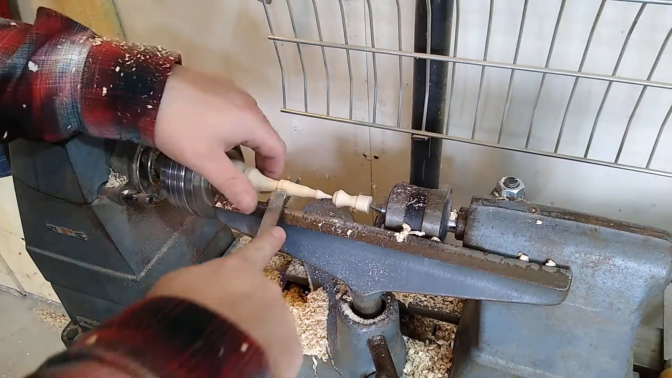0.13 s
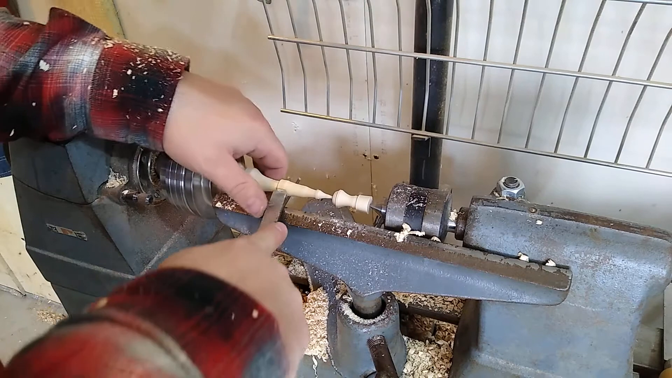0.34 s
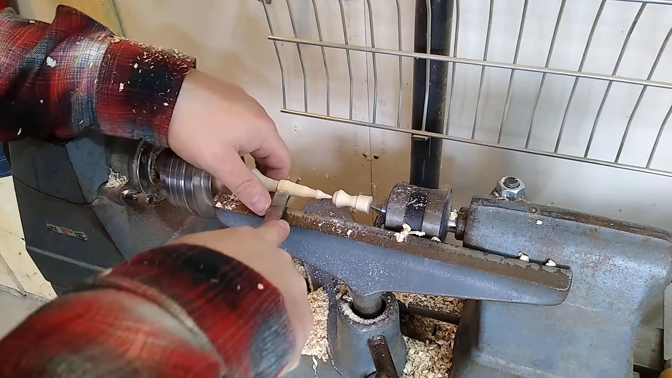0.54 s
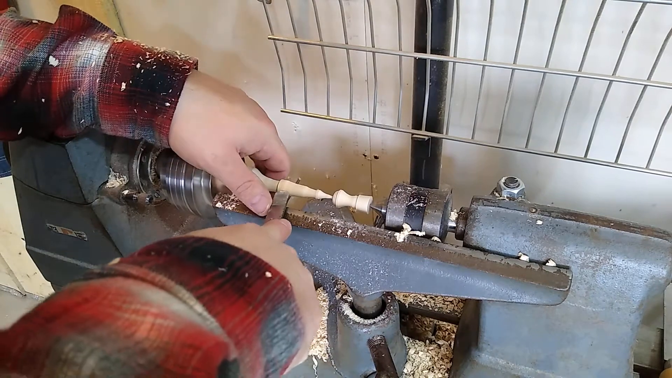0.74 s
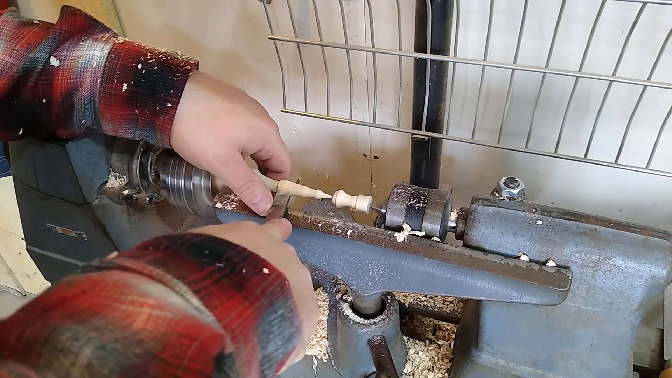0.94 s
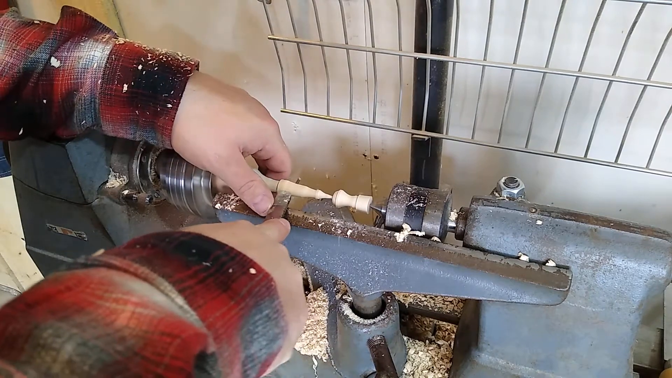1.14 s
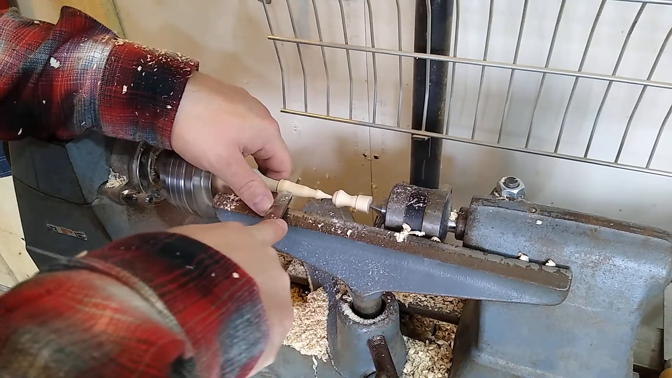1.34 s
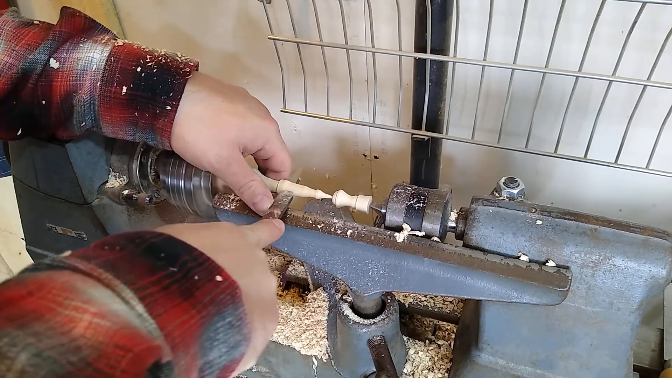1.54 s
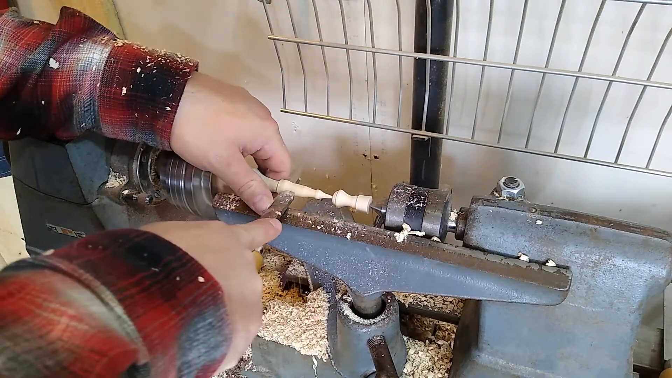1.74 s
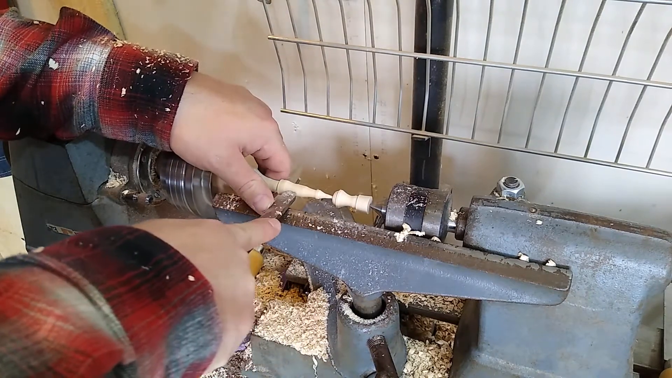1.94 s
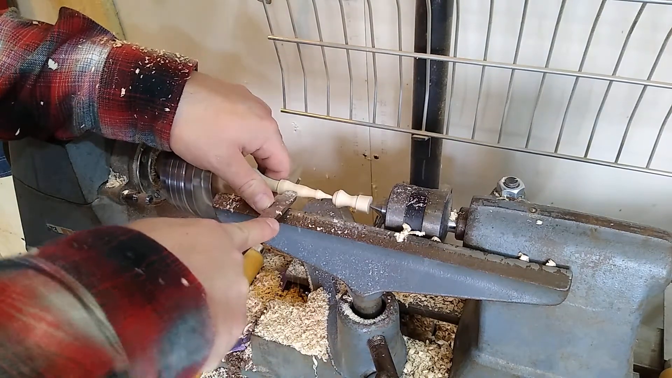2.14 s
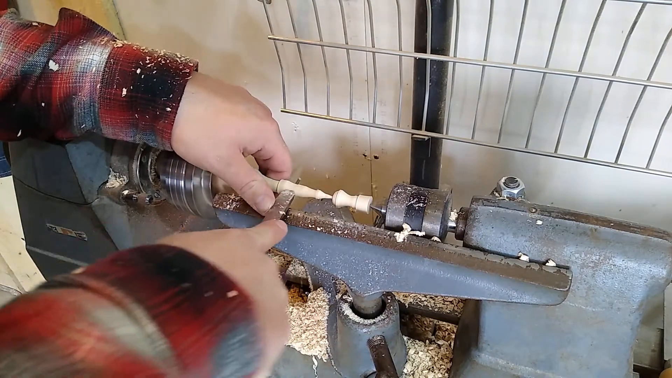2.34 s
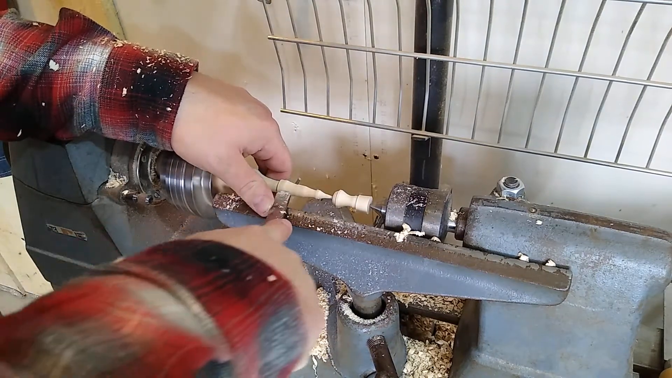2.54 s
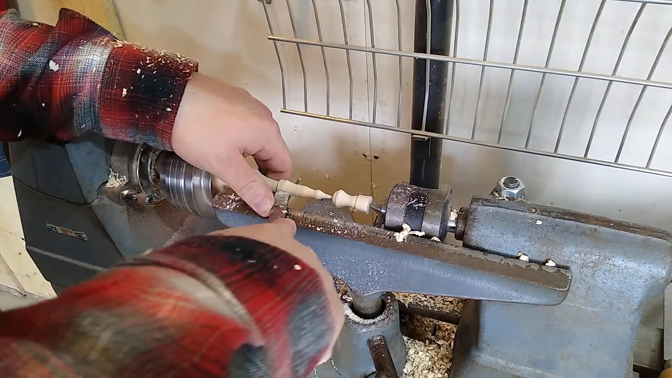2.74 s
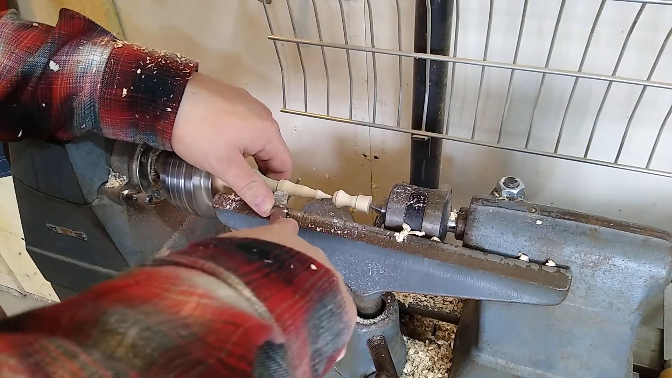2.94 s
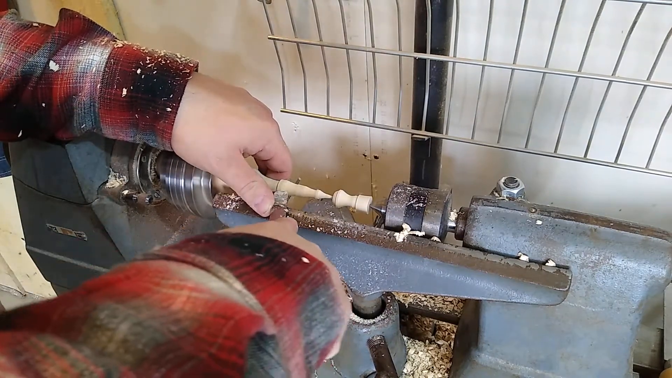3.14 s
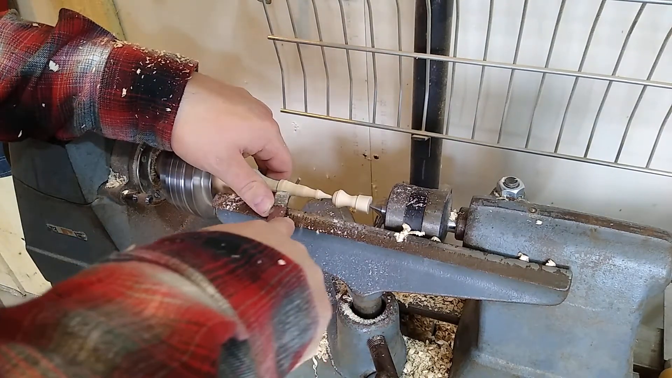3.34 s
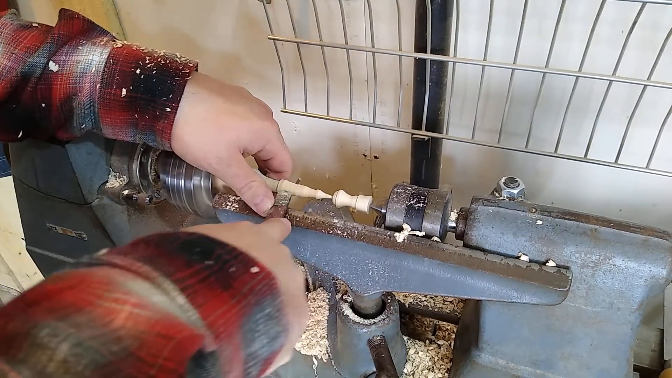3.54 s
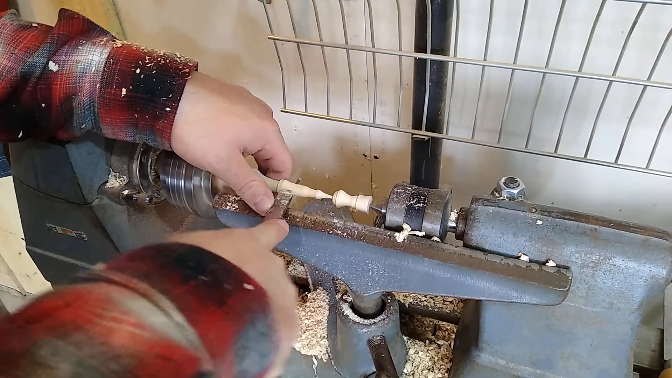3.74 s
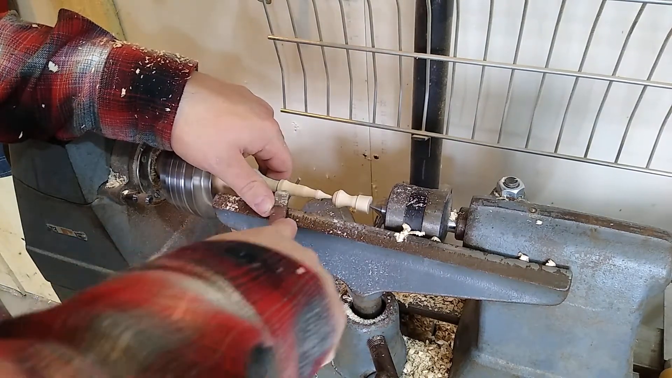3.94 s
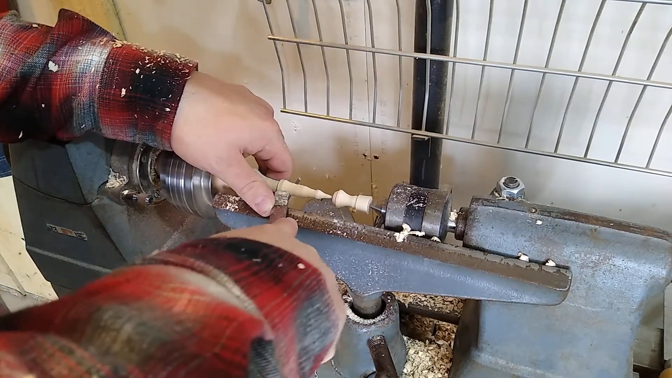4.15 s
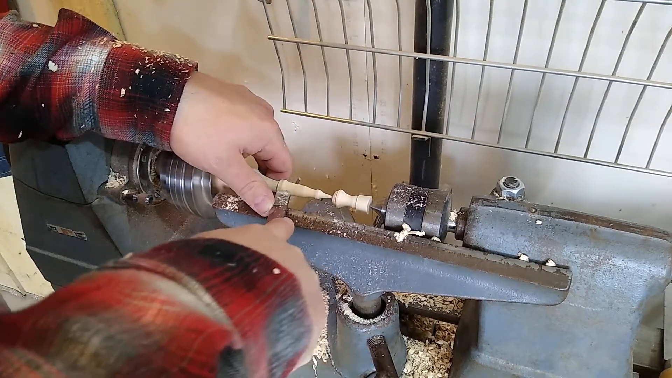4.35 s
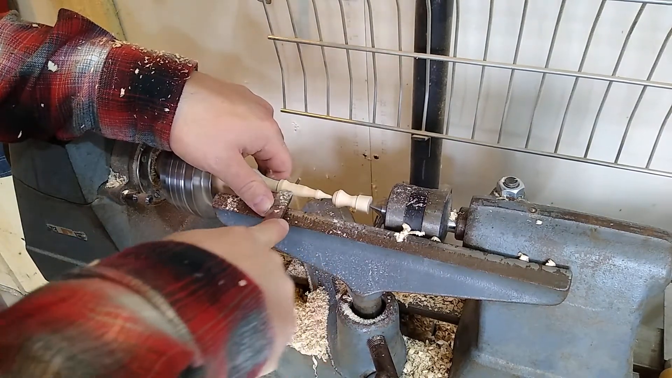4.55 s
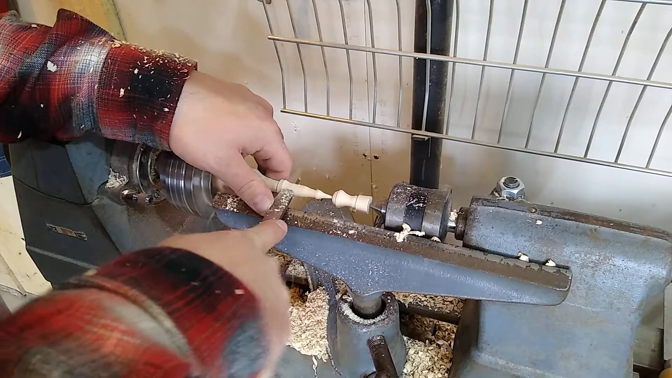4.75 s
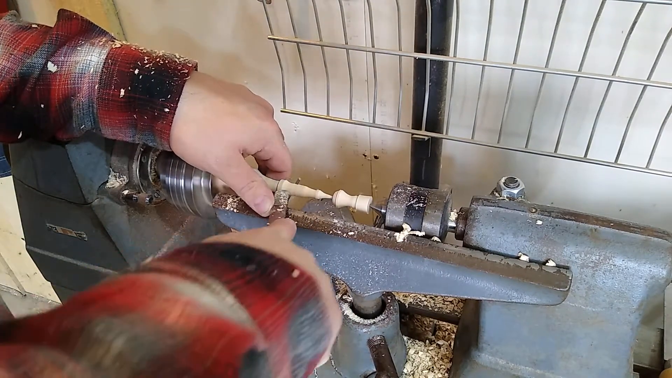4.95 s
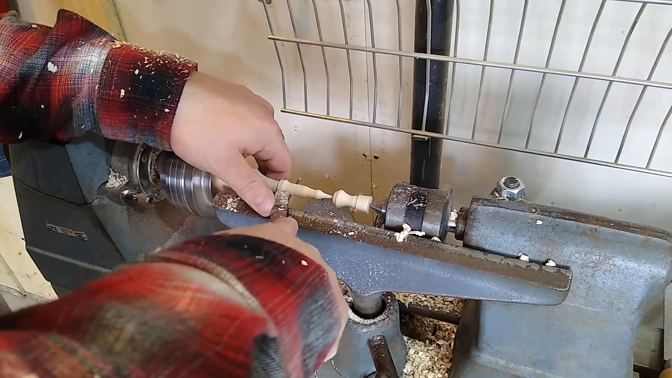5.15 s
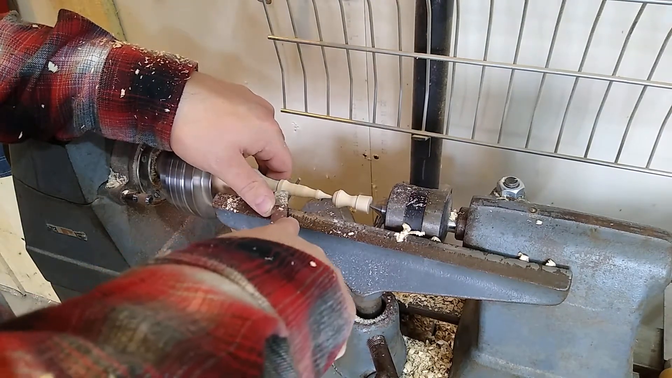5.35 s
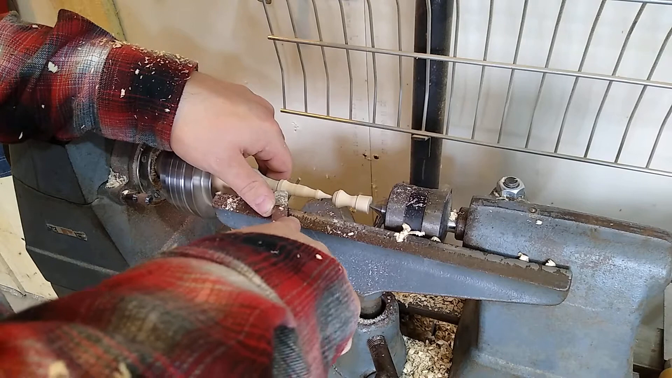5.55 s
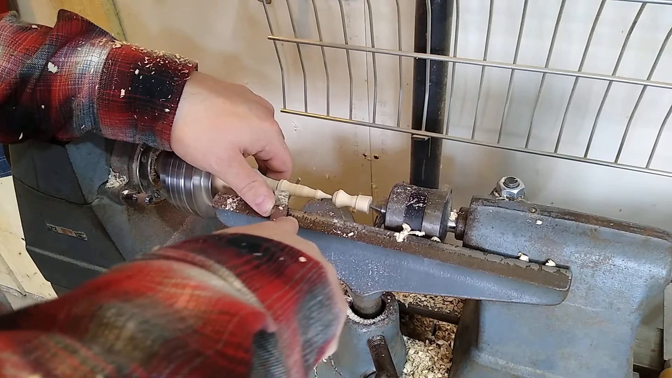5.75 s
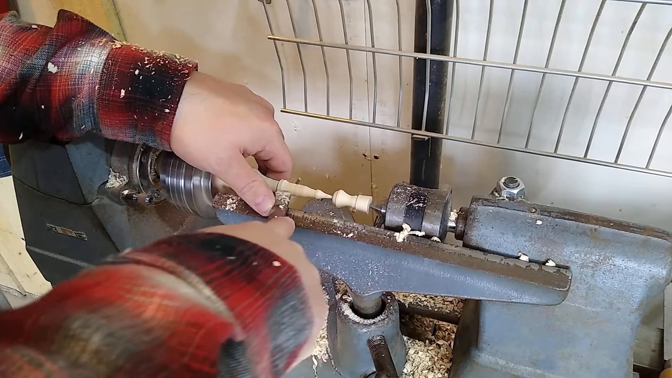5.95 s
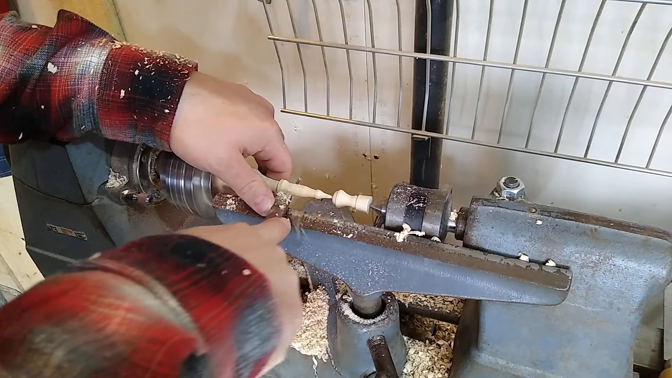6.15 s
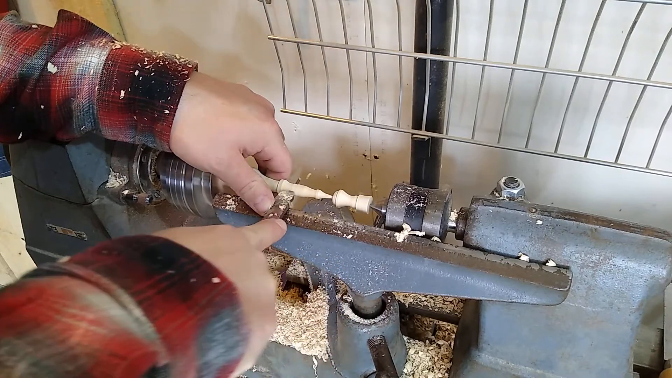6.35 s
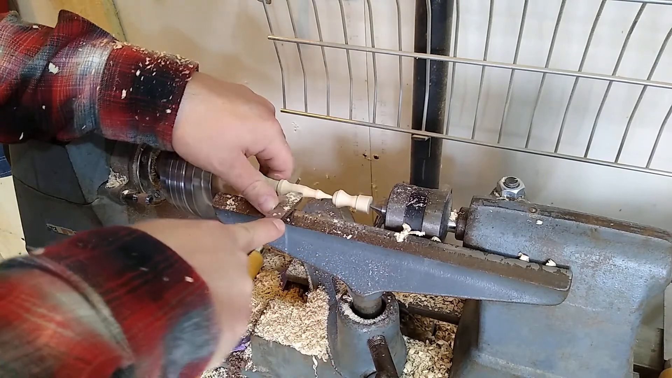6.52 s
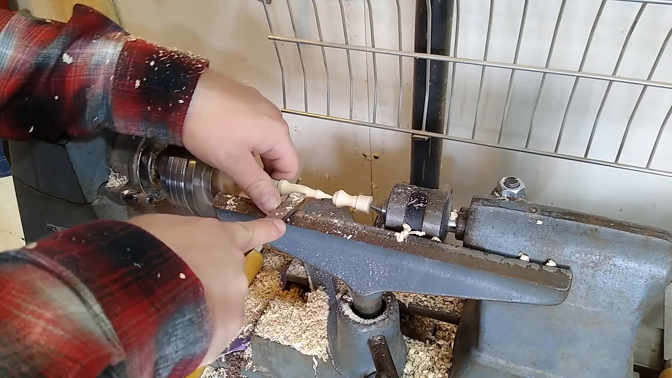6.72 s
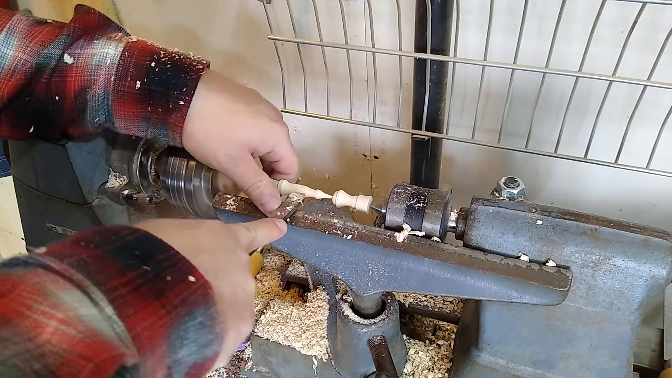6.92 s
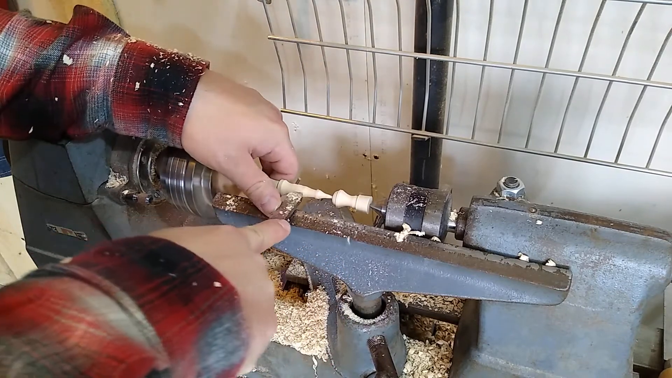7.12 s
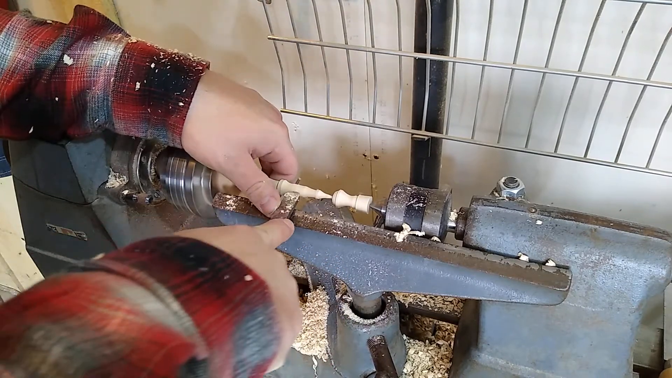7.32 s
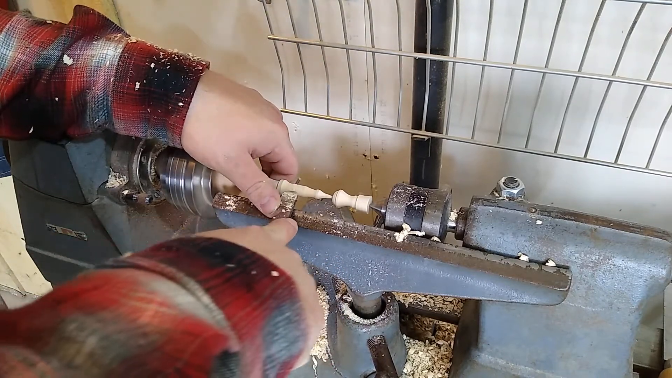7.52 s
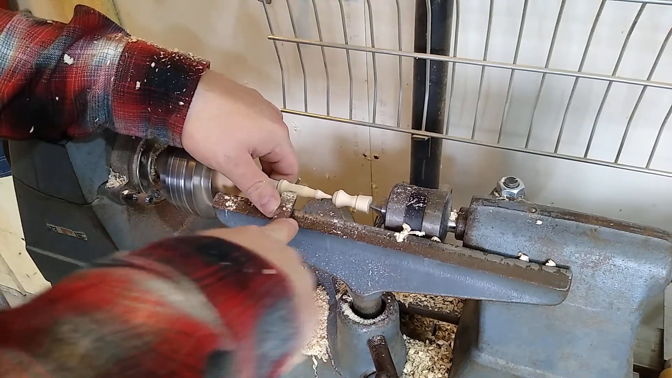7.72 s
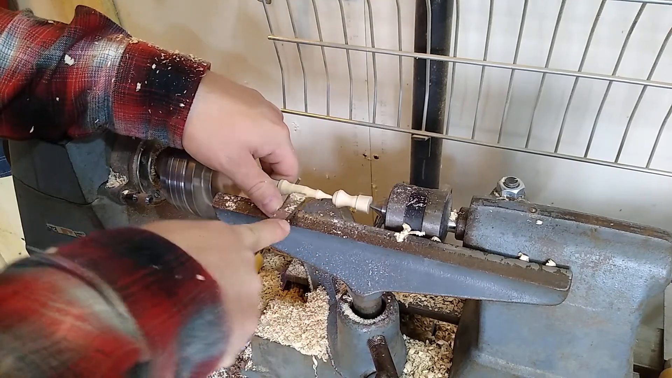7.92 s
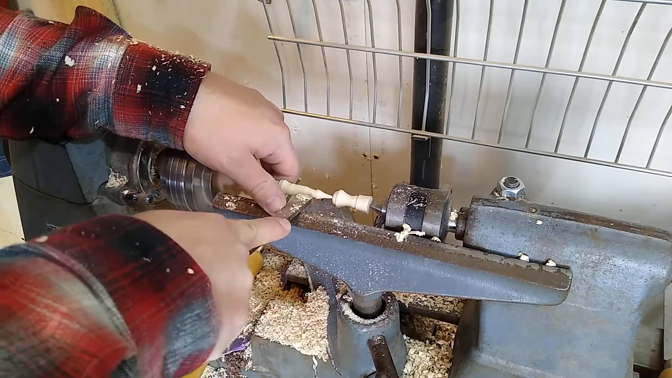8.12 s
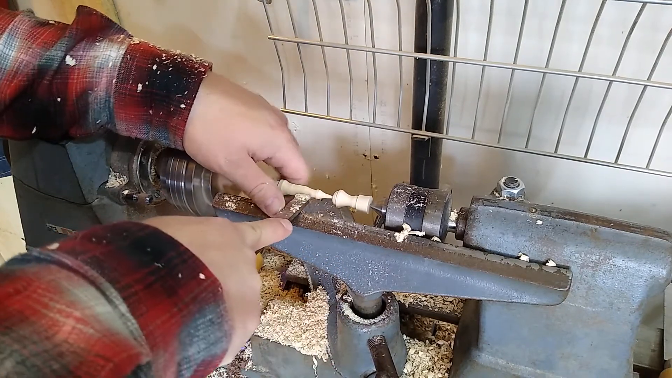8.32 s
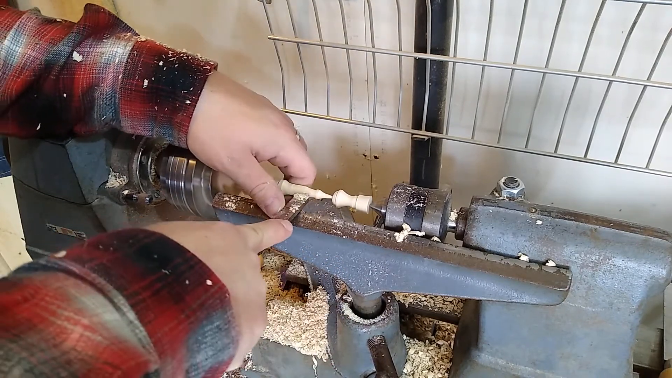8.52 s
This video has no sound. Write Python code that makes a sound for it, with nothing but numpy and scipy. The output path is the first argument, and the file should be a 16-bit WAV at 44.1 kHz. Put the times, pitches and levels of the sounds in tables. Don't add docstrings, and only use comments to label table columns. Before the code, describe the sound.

Close in a workshop, a small lathe runs steadily with low mains hum, belt whirr and fast worn-bearing ticks that come and go. After half a second a chisel touches the spinning stick, lightly at first, then with a harsh, rapidly fluttering rasp and metallic ringing. It backs off, catches sharply, and keeps surging to the end, with faint hand knocks. Slightly dull small microphone.

```python
import sys
import numpy as np
from scipy import signal
from scipy.fft import rfft, irfft, next_fast_len
from scipy.io import wavfile
from scipy.ndimage import uniform_filter1d, map_coordinates

SR = 44100
rng = np.random.default_rng(int(sys.argv[2]) if len(sys.argv) > 2 else 0)


def volts_from_decibels(level):
    exponent = np.asarray(level, float) / 20
    return 10 ** exponent


def put_to_file(sound):
    columns = np.atleast_2d(sound).T
    safe = np.clip(columns, -1, 1)
    whole_steps = np.round(safe * 32767)
    wavfile.write(sys.argv[1], SR, whole_steps.astype(np.int16))


N = 378378
T = np.arange(N) / SR
SPINDLE_HZ, MOTOR_HZ = 24.72, 19.94
FIRST_TICK_S = .013
USUAL_DB = -25

# pitch_hz, level_db (rms)
HUM_TONES = [(120.03, -49), (140, -67), (100.1, -76), (160, -73)]
# pitch_hz, level_db (per Hz)
IDLE_COLOUR = [(25, -58.5), (45, -29.5), (70, -27), (110, -30), (160, -23.5), (230, -28), (330, -24),
               (1100, -15.5), (2000, -20.5), (3500, -25), (4700, -23), (6300, -19), (7500, -23),
               (8500, -41)]
# start_s, level_db
DRIVE_LOAD = [
    (0, 2),
    (.55, 1.5),
    (2.4, 3.5),
    (8.58, 4),
]
# pitch_hz, width_hz, level_db
FRAME_MODES = [(1075, 40, 0), (1142, 30, 0), (1338, 35, -4), (1600, 18, -3), (1693, 25, -5), (1930, 70, -5),
               (2330, 35, -9), (2910, 130, -13), (3750, 60, -14), (4030, 70, -13), (4570, 90, -2),
               (4720, 120, -6), (4830, 100, -4), (4970, 110, -4)]
# pitch_hz, width_hz, level_db
BED_MODES = [(332.4, 21.8, -0.5), (391.7, 18.8, 0.5), (441, 31, -1), (501, 15, -7), (574.8, 14, 2.5),
             (604, 100, -6), (687, 31, 1), (689, 7, -9), (763, 20, -1.5), (864, 6.8, -3.5), (902, 37, 4)]
# start_s, level_db (peak), pitch_hz
HAND_BUMPS = [
    (3.631, -53, 88.6),
    (6.944, -44.5, 81),
    (8.36, -55.5, 55),
    (8.45, -55, 50),
    (8.53, -56, 60),
    (.12, -66, 49.3),
    (0.548, -57, 50),
]
# pitch_hz, width_hz, level_db
REST_MODES = [(981, 21, 0), (952, 26, -8), (1020, 26, -14), (1054, 34, -11), (900, 40, -18)]
# pitch_hz, width_hz, level_db
POST_MODES = [(1145, 45, -1), (1232, 25, -4), (1271, 20, 0), (1340, 50, -5), (1420, 40, -5), (1474, 20, 1),
              (1600, 25, -4), (1660, 30, -6), (1855, 60, -2), (2135, 60, -1), (3240, 80, -8),
              (3445, 24, -4), (3560, 30, -9), (3632, 22, -2), (3690, 25, -6), (3743, 26, -3),
              (3850, 50, -5)]
# pitch_hz, width_hz, level_db
STICK_MODES = [(2280, 70, -9), (2370, 60, -8), (2447, 66, -1), (2545, 70, -7), (2620, 70, -7),
               (2700, 60, -13)]
# pitch_hz, width_hz, level_db
SPUR_MODES = [(2810, 70, -6), (2900, 60, 0), (2960, 60, -1)]
# pitch_hz, width_hz, level_db
SHANK_MODES = [(3975, 70, -1), (4118, 60, 0)]
# pitch_hz, width_hz, level_db
BLADE_MODES = [(4347, 59, -10), (4547, 104, -3.5), (4880, 60, -6.5), (4956, 186, -8.5), (5034, 510, -13)]
# pitch_hz, width_hz, level_db
EDGE_MODES = [(7315, 750, 0)]
# pitch_hz, level_db (per Hz)
CHIP_COLOUR = [(150, -54), (300, -15), (900, -19), (1300, -2), (2000, -7.5), (3200, -6.5), (4300, -9),
               (5500, -2.5), (6500, -13.5), (7400, -25), (8300, -37), (8700, -92)]
# start_s, level_db (over the cut), t60_s
CATCHES = [
    (0.563, 4, 0.54),
    (2.588, 16.5, 0.13),
    (6.844, 14.5, 0.041),
]
# start_s, level_db
PUSH_CURVE = [(.56, -38), (.75, -36.5), (1.18, -22), (1.75, -23), (2.3, -25.5), (2.67, -30), (3.1, -24),
              (3.26, -17), (3.8, -22.5), (4.0, -27), (4.3, -23), (4.52, -20.5), (5.05, -28.5),
              (5.55, -27.5), (6.08, -20), (6.45, -23), (7.4, -20.5), (8.3, -26)]
# start_s, reach_steps
REACH_CURVE = [(.6, -1), (1.2, -6), (1.9, 6), (2.4, 12.5), (2.651, -1), (4.2, -6), (4.8, -0.5), (5.098, -6),
               (6.2, -3), (6.9, 4), (7.402, 10.5), (7.8, -1.5), (8.1, -2.5), (8.35, 12.5)]
# start_s, tilt_steps
TILT_CURVE = [(.6, 6), (1.5, 4), (2.4, 4), (2.75, -2), (3.3, -2), (3.65, 7), (3.85, 8), (4.15, 0),
              (4.6, 3.5), (4.8, 9), (5.2, -3), (5.9, 1), (6.35, 1), (6.65, 4), (7.05, 0), (7.7, 1),
              (8.1, 4.5), (8.58, -3.5)]
# start_s, fall_s, back_s
EDGE_LIFTS = [
    (2.3, .09, 2.66),
    (6.66, .16, 6.881),
    (8.11, .035, 8.19),
    (3.82, .12, 3.96),
    (4.72, .22, 5.03),
    (.64, .05, .715),
    (.785, .025, .815),
]
LIFT_DEPTHS = [-13, -11.5, -2.5, -3.5, -4, -8, -8]
LIFT_RETURNS = [.01, .015, .05, .08, .03, .03, .015]
# start_s, level_db
EDGE_DIGS = [(0.779, 2.5), (1.137, -0.5), (1.72, 1.5), (2.67, 2.5), (2.79, 2.5), (3.26, -1.5), (3.42, 1),
             (3.52, 2), (4.24, -0.5), (4.6, 2), (5.05, 1.5), (6.02, 1), (6.64, 0.5), (6.91, 0), (7.3, 1),
             (8.09, 4), (8.259, 3)]
# level_db (usual push), push_db_per_db, reach_db_per_step, tilt_db_per_step
PART_ANSWERS = [
    (-3.5, 1.24, 0.081, 0.19),
    (-6, 1.06, 0.33, 0.41),
    (-7, 0.9, -0.43, -0.13),
    (-13, 1.06, -.1, -0.24),
]
PART_FLUTTER = [0.72, 1, 0.92, 0.77]
# start_s, level_db, half_length_s
REST_CHATTER = [(1.42, 3.5, 0.078), (1.7, 4.5, 0.026), (1.81, 5, .05), (2.26, 2, 0.023), (2.95, 2.5, 0.012),
                (3.42, 5.5, 0.051), (4.18, 6, 0.023), (4.47, 3.5, .05), (5.38, 10.5, 0.2), (5.82, 8, 0.12),
                (6.1, 3.5, 0.053), (6.27, 4.5, 0.061), (6.42, 7.5, 0.041), (6.63, 4.5, 0.031),
                (6.94, 1.5, 0.013), (7.1, 3.5, 0.024), (7.3, 1, 0.017), (7.45, 4, 0.029), (7.82, 2.5, 0.03),
                (8.1, 0.5, 0.022), (8.25, 1.5, 0.069), (8.5, 2, 0.18)]
# start_s, level_db, half_length_s
STICK_WHIP = [(.9, 2, 0.3), (1.2, -0.5, 0.16), (1.75, 3, 0.33), (2.65, 1, .08), (3.22, 2, 0.036),
              (4.6, 2.5, 0.18), (5.12, 2, 0.38), (5.6, 1.5, 0.11), (6.18, 2.5, 0.19), (6.7, 3, 0.18),
              (7.52, 2.5, 0.047), (7.95, 0.5, .15)]
# start_s, level_db, half_length_s
SHANK_FLEX = [(1.2, -2, .1), (1.42, 8, 0.03), (1.72, 2, 0.093), (2.85, 1.5, .2), (3.63, 10.5, .1),
              (4.1, 3, 0.041), (4.45, 6.5, 0.24), (5.1, 3, .06), (5.48, 5, 0.086), (6.25, 8.5, 0.28),
              (6.52, 5, 0.045), (7.33, 2.5, .1), (7.6, 8.5, .1), (7.82, 8, 0.11)]


def unit(x):
    return x / np.sqrt(np.mean(x ** 2) + 1e-20)


def wobble(rate):
    knots = rng.standard_normal(int(N * rate / SR) + 4)
    return map_coordinates(knots, [T * rate])


def curve(rows):
    return np.interp(T, *np.transpose(rows))


def swells(rows):
    return sum(db * np.exp(-((T - s) / half) ** 2) for s, db, half in rows)


def filtered(x, response):
    m = next_fast_len(N + 8192)
    return irfft(rfft(x, m) * response(np.fft.rfftfreq(m, 1 / SR)), m)[:N]


def colour(points):
    hz, db = np.transpose(points)
    return lambda f: volts_from_decibels(np.interp(np.log(f + 1), np.log(hz), db))


def modes(rows):
    def response(f):
        total = 0
        for k, (centre, width, db) in enumerate(rows):
            damping = 1j * f * width
            total = total + (-1) ** k * volts_from_decibels(db) * damping / (centre ** 2 - f ** 2 + damping + 1e-9)
        return total
    return response


def sharp(rows):
    return lambda f: modes(rows)(f) * f / (f + 300j)


def mains_hum():
    tones = sum(np.sqrt(2) * volts_from_decibels(db) * np.sin(2 * np.pi * hz * T) for hz, db in HUM_TONES)
    return tones * volts_from_decibels(.2 * wobble(3))


def drive_noise():
    belt_slap_db = 1.2 * np.cos(2 * np.pi * MOTOR_HZ * (T - FIRST_TICK_S))
    drift_db = 0.37 * wobble(5.7) + 0.88 * wobble(30)
    noise = rng.standard_normal((3, N)) * volts_from_decibels(curve(DRIVE_LOAD) + belt_slap_db + drift_db)
    whirr = volts_from_decibels(-41.0) * unit(filtered(noise[0], colour(IDLE_COLOUR)))
    frame = volts_from_decibels(-40) * unit(filtered(noise[1], modes(FRAME_MODES)))
    bed = volts_from_decibels(-47.0) * unit(filtered(noise[2], modes(BED_MODES)))
    return whirr + frame + bed


def bearing():
    turn = np.arange(int(N / SR * MOTOR_HZ))
    off_load = 1 - np.cos(2 * np.pi * (turn * .5707 - .035))
    warm_up_db = 3.5 * np.minimum(turn / 50, 1)
    relief_db = np.minimum(17 * off_load ** .6, 15)
    size_db = -25.5 + warm_up_db - relief_db + rng.normal(0, 1.2, len(turn))
    blows = np.zeros(N)
    blows[((FIRST_TICK_S + turn / MOTOR_HZ) * SR).astype(int)] = volts_from_decibels(size_db)
    t = T[:SR // 10]
    ring = np.sin(2 * np.pi * 1930 * t) + .8 * np.sin(2 * np.pi * 1965 * t)
    envelope = volts_from_decibels(-60 * t / 0.089) * (1 - np.exp(-t / 0.0047))
    return volts_from_decibels(-2.5) * signal.fftconvolve(blows, ring * envelope)[:N]


def bumps():
    total = 0
    for s, db, hz in HAND_BUMPS:
        bell = np.exp(-((T - s - .015) / 0.012) ** 2)
        total = total + volts_from_decibels(db) * bell * np.sin(2 * np.pi * hz * (T - s))
    return total


def taps():
    bell = np.exp(-((T - 6.8465) / .0025) ** 2)
    return volts_from_decibels(-16) * bell * np.sin(2 * np.pi * 4950 * T)


def hand():
    push, reach, tilt = curve(PUSH_CURVE), curve(REACH_CURVE), curve(TILT_CURVE)
    push = push - USUAL_DB + swells((s, db, .025) for s, db in EDGE_DIGS)
    for (start, fall, back), db, rise in zip(EDGE_LIFTS, LIFT_DEPTHS, LIFT_RETURNS):
        lifted = np.minimum((T - start) / fall, 1 - (T - back) / rise)
        push = push + db * np.clip(lifted, 0, 1)
    parts = []
    for (db, per_push, per_reach, per_tilt), flutter_db in zip(PART_ANSWERS, PART_FLUTTER):
        answer_db = USUAL_DB + db + per_push * push + per_reach * reach + per_tilt * tilt
        parts.append(answer_db + flutter_db * wobble(20))
    whip_db = swells(STICK_WHIP)
    parts[1] = parts[1] + swells(REST_CHATTER)
    parts[2] = parts[2] + whip_db
    parts[3] = parts[3] + swells(SHANK_FLEX)
    skip = 0.13 * np.clip(-push, 0, 8)
    lean_db = -0.3 * reach - .5 * whip_db
    bright_db = 0.37 * tilt
    shaving_db = 0.34 * tilt + 0.19 * reach - 0.11 * push
    return parts, skip, lean_db, bright_db, shaving_db


def edge_contact():
    contact = 1. * (T > .563)
    for at, db, t60 in CATCHES:
        contact = contact + (T > at) * volts_from_decibels(db - 60 * np.abs(T - at) / max(t60, .01))
    return contact * volts_from_decibels(0.12 * wobble(12) + 0.067 * wobble(35))


def turning(once, once_lag, twice, twice_lag):
    angle = 2 * np.pi * SPINDLE_HZ * T
    power = 1 + once * np.cos(angle + once_lag) + twice * np.cos(2 * angle + twice_lag)
    return np.sqrt(np.clip(power, .03, 4))


def steadied(x, share):
    swing = np.sqrt(np.abs(uniform_filter1d(x ** 2, size=SR // 25)) + 1e-12)
    return unit(x / swing ** np.clip(share, 0, 1))


def chisel():
    (blade_db, rest_db, stick_db, shank_db), skip, lean_db, bright_db, shaving_db = hand()
    contact = edge_contact()
    tear = volts_from_decibels(0.56 * wobble(150) + 1.5 * wobble(500))

    def part(response, force, rough_db):
        gain = np.abs(response(np.linspace(1, SR / 2, num=20000)))
        scale = np.sqrt(np.mean(gain ** 2))
        rasp = unit(rng.standard_normal(N) * tear * volts_from_decibels(rough_db * wobble(120)))
        return filtered(contact * force * rasp, response) / scale

    push_db = 0.45 * blade_db + 0.31 * rest_db + 0.28 * stick_db
    push_db = uniform_filter1d(push_db, size=SR // 20) + shaving_db
    edge_db = 0.47 * blade_db + 0.3 * push_db - 22

    blade = part(sharp(BLADE_MODES), turning(0.33, 0.35, 0.26, 1.6) * volts_from_decibels(blade_db - 2.7), 0.18)
    chatter = steadied(filtered(rng.standard_normal(N), sharp(REST_MODES)), share=0.51)
    rest_force = uniform_filter1d(contact ** 0.12 * volts_from_decibels(rest_db - 2.3), size=SR // 100)
    rest = chatter * rest_force * turning(0.25 + skip, .05, 0.14, 0.34)
    stick_force = turning(0.077, .05, 0.96, 1.0) * volts_from_decibels(stick_db - lean_db - 5.0)
    stick = part(sharp(STICK_MODES), stick_force, 0.23)
    spur_force = turning(0.055, .05, 0.056, .3) * volts_from_decibels(stick_db + lean_db - 7.5)
    spur = part(sharp(SPUR_MODES), spur_force, 0.54)
    shank = part(sharp(SHANK_MODES), turning(0.23, .5, 0.41, 0.4) * volts_from_decibels(shank_db - 3.0), 0.52)
    post = part(sharp(POST_MODES), volts_from_decibels(push_db - 7.5), 1.2)
    bed = part(sharp(BED_MODES), volts_from_decibels(push_db - 15.5), 0.84)
    edge = part(lambda f: modes(EDGE_MODES)(f) ** 2, turning(0.31, 1.8, 0.25, -.5) * volts_from_decibels(edge_db), 1.5)
    chip_force = turning(0.34, 0.64, 0.11, .1) * volts_from_decibels(push_db + bright_db - 8.5)
    chips = part(colour(CHIP_COLOUR), chip_force, 1.1)
    return blade + rest + stick + spur + shank + post + bed + edge + chips


def scene():
    machine = mains_hum() + drive_noise() + bearing()
    return (machine + bumps() + taps() + chisel())[None]


def band_limit(x):
    return signal.sosfilt(signal.butter(12, 8520, fs=SR, output="sos"), x)


def record(dry):
    mic = colour([(20, -24), (60, 0), (5200, 0.5), (6400, -12.0), (7700, -6.5),
                  (8500, -21.0), (8650, -37), (9000, -90)])
    mix = filtered(dry[0], mic)[None]
    return band_limit(mix)


dry = scene()
out = record(dry)
put_to_file(out)
```